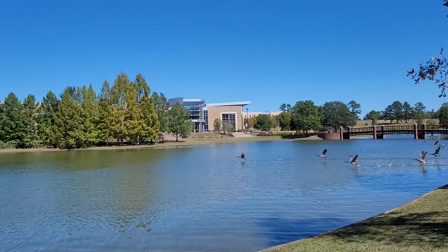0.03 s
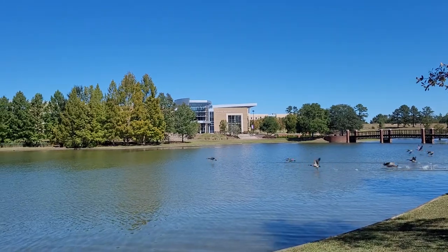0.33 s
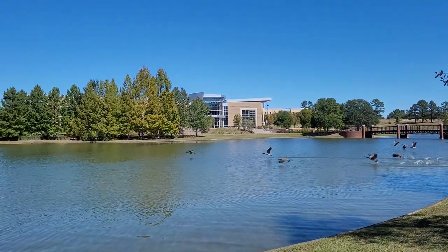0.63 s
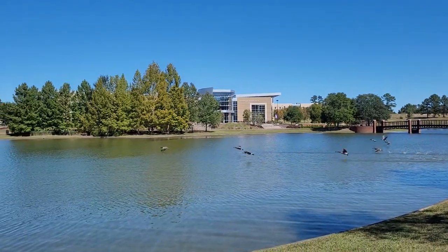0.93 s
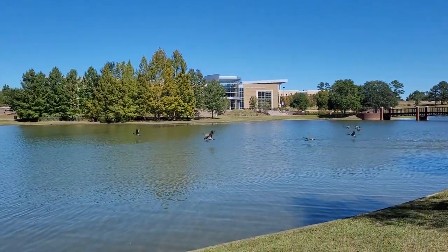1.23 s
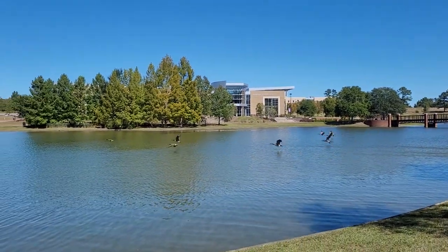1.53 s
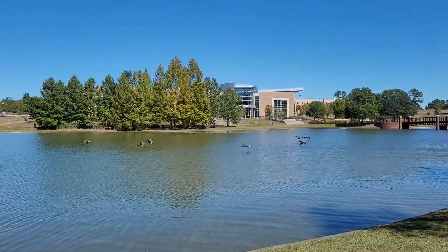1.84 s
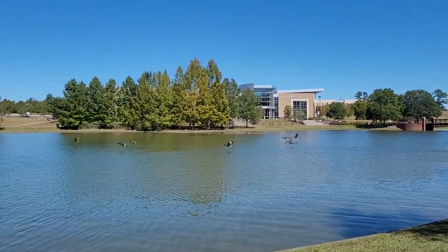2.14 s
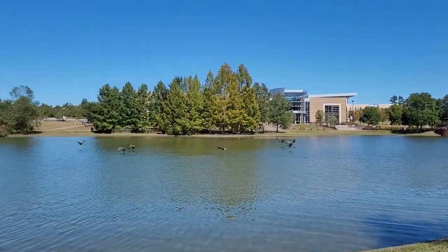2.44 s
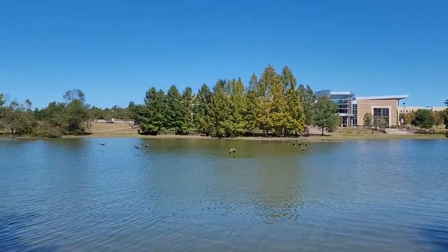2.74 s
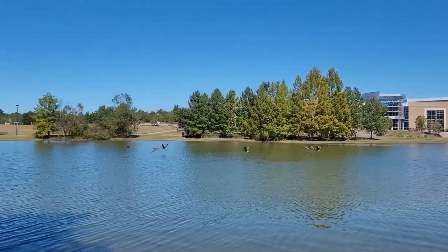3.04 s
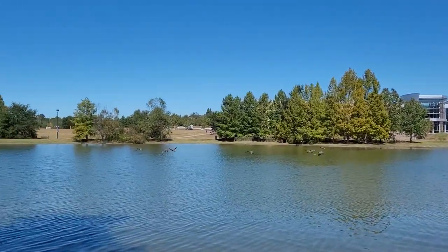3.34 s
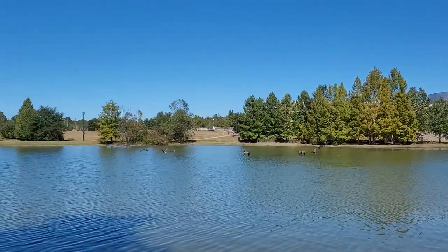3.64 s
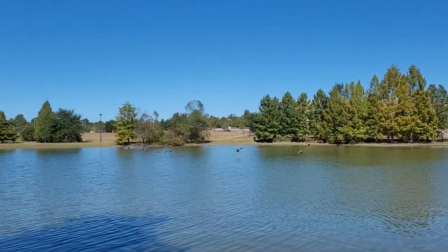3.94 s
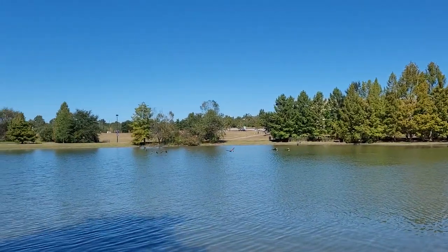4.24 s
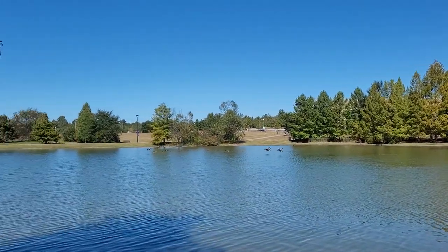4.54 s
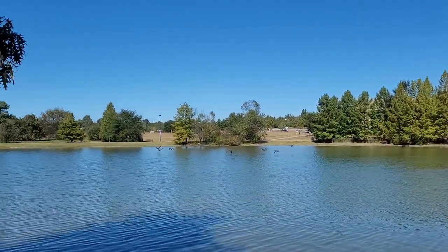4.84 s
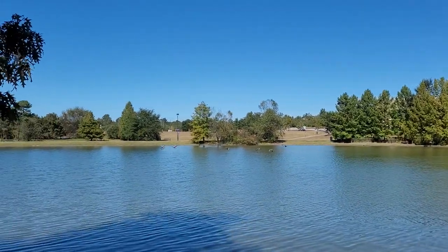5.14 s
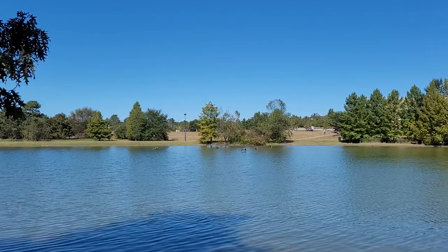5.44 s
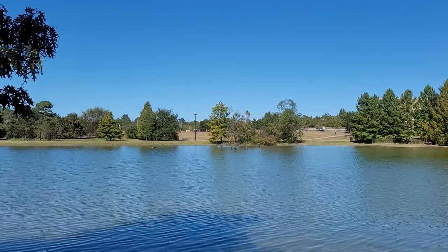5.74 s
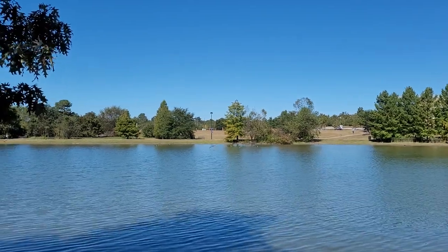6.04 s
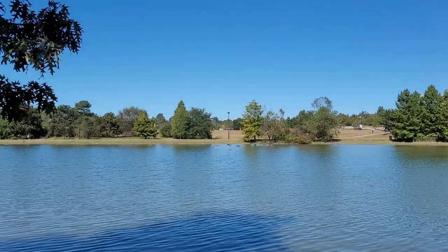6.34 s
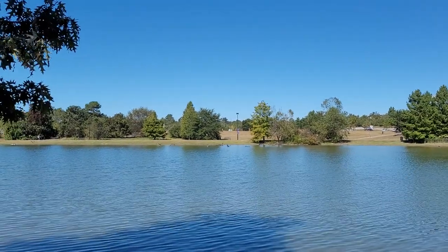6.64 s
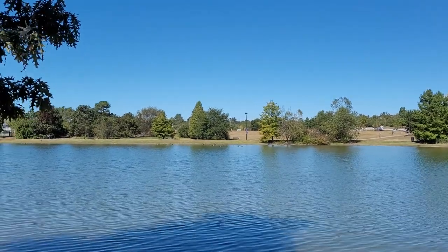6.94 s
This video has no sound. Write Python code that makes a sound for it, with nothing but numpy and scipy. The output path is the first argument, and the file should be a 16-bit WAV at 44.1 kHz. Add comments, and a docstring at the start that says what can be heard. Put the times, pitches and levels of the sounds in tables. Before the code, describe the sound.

Geese take off from a pond in open land, with faint splashing in the first second or two. They honk over and over as they fly low from right to left, one leading with yelping, two-part honks while others answer with honks and short falling clucks. The calls echo softly off the far bank and gradually weaken. Wind rumbles on the microphone, gusting more near the end.

```python
"""A pond in open land. Geese take off, splashing, and fly away low, right to left, calling to each other.
Each voice is a vibrating membrane shaped by the throat. The leader yelps, breaks into a low note and
flips up to a honk; others answer with honks and falling clucks. Faint, wavering honks or their echoes
come from the left, and the far bank echoes. Wind buffets the two microphone ports over a faint hush,
rustle and ticks."""
import sys
import numpy as np
from scipy import signal
from scipy.fft import rfft, irfft, next_fast_len
from scipy.io import wavfile
from scipy.ndimage import map_coordinates

SR = 44100
rng = np.random.default_rng(int(sys.argv[2]) if len(sys.argv) > 2 else 0)


def put_to_file(sound):
    """Save the sound as 16-bit audio at rate SR, in the file named by the first command-line argument."""
    columns = np.atleast_2d(sound).T  # one column per channel
    safe = np.clip(columns, -1, 1)
    whole_steps = np.round(safe * 32767)
    wavfile.write(sys.argv[1], SR, whole_steps.astype(np.int16))


N = 313110

# Path of the answering birds: (time [s], bearing [+ right])
FLOCK_PATH = [(.15, 1), (1.3, 0.19), (2.7, .45), (3.5, -0.24), (7, -0.37)]


def leader():
    """The lead goose: yelp, low note, rasp, honk."""
    # (time [s], bearing [+ right])
    path = [(.55, 1.3), (1.1, 1.16), (1.85, 0.57), (3.4, 0.64), (7, 0.21)]
    # Columns as in honks()
    notes = [ (.535, .55, .598, 735, 731, 702, -34.5, -25, -25.5, -50.5, 4, -41),
             (1.033, 1.105, 1.135, 680.4, 757, 707, -32.5, -22.5, -34, -49.5, -8, -35.5),
             (1.8, 1.905, 1.953, 690, 730.4, 700, -33, -20, -25, -48.5, -0.5, -37),
             (2.625, 2.755, 2.805, 677, 723.6, 678, -33, -25, -29.5, -50.5, -4.5, -41),
             (3.31, 3.42, 3.455, 681, 717.4, 654, -35, -27.5, -32, -59, 4.5, -44),
             (3.945, 4.05, 4.082, 679.5, 704, 700, -37.5, -26.5, -35, -61, 6.5, -44.5),
             (4.87, 5.025, 5.09, 672.4, 685.3, 637, -37, -26, -29.5, -64.5, 6, -46),
             (5.72, 5.89, 5.925, 653, 686, 646, -39, -28, -33, -68.5, 3.5, -48.5),
             (6.83, 6.975, 7.11, 659, 687, 688, -40.5, -34, -32, -65.5, 5, -44.5)]
    voice = yelps(path) + low_notes(path)
    voice += honks(notes, path, bend=1.9, jitter=.006, shimmer_db=.96, bright_db=-.5, air_db=10.5)
    voice += rasps(notes, path, lead_s=.07, overlap_s=.024, swell_db=2)
    return voice * amp([[.84], [-.84]])  # slightly louder in the left channel


def follower():
    """An answering goose with a brighter throat."""
    # Columns as in honks()
    notes = [ (.447, .5, .545, 670.6, 757, 750, -33, -25, -30.5, -60, 11, -36.5),
             (3.42, 3.455, 3.52, 709, 721, 620, -42.5, -18.5, -35, -76, 5, -47),
             (4.17, 4.25, 4.335, 711, 737, 622, -37.5, -26.5, -31, -67, 11, -45.5),
             (4.89, 4.93, 5.0, 736, 722, 712, -37, -34, -32, -66, 9.5, -46),
             (5.595, 5.635, 5.71, 646, 724, 702, -37, -23.5, -36.5, -63.5, -3, -41.5),
             (6.31, 6.345, 6.43, 725, 732.5, 674, -39.5, -33, -37, -63.5, -3.5, -47.5)]
    # Throat colour: (frequency [Hz], gain [dB])
    ring = [(2300, -1), (2900, -4.5), (3600, -1), (4400, -0.5), (5100, 15), (5800, 8), (6600, 5.5),
            (8000, 2.5)]
    voice = honks(notes, FLOCK_PATH, bend=.89, jitter=.0045, shimmer_db=.7, bright_db=2.5, air_db=6)
    return coloured(voice, ring) + rasps(notes, FLOCK_PATH, lead_s=.082, overlap_s=.024, swell_db=11)


def brassy_goose():
    """A low-pitched goose with fewer harmonics."""
    # Columns as in honks()
    notes = [ (1.125, 1.167, 1.24, 479, 513.3, 479, -40.5, -39, -34.5, -58.5, 2, -38.5),
             (1.812, 1.84, 1.93, 488, 502, 505, -38, -31, -31.5, -55, 0, -52),
             (2.64, 2.65, 2.71, 511, 499, 494, -44, -31, -33.5, -61.5, 0, -51)]
    voice = honks(notes, FLOCK_PATH, bend=.8, jitter=.005, shimmer_db=.2, bright_db=1, air_db=11.5,
                  harmonics=8)
    return voice + rasps(notes, FLOCK_PATH, lead_s=.004, overlap_s=.047, swell_db=1.5)


def honks(notes, path, bend, jitter, shimmer_db, bright_db, air_db, harmonics=16):
    """The bird strains towards a crest, bending and brightening the note, which then fades.
    notes: (start, crest, end [s], pitch at each [Hz], fundamental, octave at start, octave at crest,
    treble, third-harmonic lift, opening rasp [dB])"""
    # Air forced through the throat: (frequency [Hz], density [dB])
    air_colour = [(1500, -21), (3300, 0.5), (4300, 0), (6000, 6), (8000, -4), (11000, -8.5), (15000, -18)]
    attack_s, attack_db, strain_db = .014, 6.5, 7
    peak_s, peak_db, fade_db, treble_fade_db = .033, 3.5, 10.5, 11
    out, air = np.zeros((2, N)), noise(air_colour)
    for start, crest, end, start_hz, crest_hz, end_hz, *levels in notes:
        first_db, open_db, crest_db, treble_db, third_db, _ = levels
        t, gate = note_span(start, end, edge_s=.009)
        strain, droop = progress(t, start, crest) ** bend, progress(t, crest, end) ** 2
        pitch_hz = start_hz + (crest_hz - start_hz) * strain + (end_hz - crest_hz) * droop
        octave_db = open_db + (crest_db - open_db) * strain - fade_db * droop
        octave_db -= attack_db * (1 - progress(t, start, start + attack_s))
        high_db = treble_db + bright_db - strain_db * (1 - strain) - treble_fade_db * droop
        high_db += peak_db * (swell(t, crest, peak_s) - .5)
        voice = syrinx(t, pitch_hz, first_db - fade_db * droop, octave_db, high_db,
                       curves(path, t)[0], jitter, shimmer_db, harmonics, third_db)
        # The harder the honk, the larger its share of air.
        breath = amp(1.3 * high_db + air_db) * air[:, np.round(t * SR).astype(int)]
        add(out, t, gate * (voice.real + breath))
    return out


def yelps(path, depth=.042, dip_db=4.5, bright_db=5.5):
    """One pitch swing, down and up; the octave is loudest at the bottom, the treble at the top."""
    # (time [s], length [s], pitch [Hz], fundamental [dB], octave [dB], treble [dB])
    notes = [(0.936, 0.048, 698, -36, -25, -63), (1.69, 0.044, 708, -34.5, -24.5, -51.5),
             (2.51, 0.055, 708, -36, -27.5, -57.5), (3.189, 0.049, 698, -37.5, -36, -66),
             (3.838, 0.052, 684, -39.5, -31, -63), (4.723, .048, 671, -39.5, -27.5, -66.5),
             (5.518, 0.045, 685, -46, -37.5, -67), (6.686, 0.049, 674, -44.5, -34.5, -71)]
    out = np.zeros((2, N))
    for start, length, hz, first_db, octave_db, treble_db in notes:
        t, gate = note_span(start, start + length)
        swing = -np.sin(2 * np.pi * progress(t, start, start + length))
        voice = syrinx(t, hz * (1 + depth * swing), first_db, octave_db - dip_db * (1 + swing),
                       treble_db - bright_db * (1 - swing), curves(path, t)[0],
                       jitter=.01, shimmer_db=.5)
        add(out, t, gate * voice.real)
    return out


def low_notes(path, rise=.05, swell_db=12, slide_depth=.089, slide_s=.008):
    """The low register, about a fifth down, pushed harder until it flips up."""
    # (time [s], length [s], pitch [Hz], fundamental [dB], final octave [dB])
    notes = [(.48, 0.048, 488.4, -36.5, -27.5), (.975, 0.065, 483, -41, -36), (1.733, 0.071, 476, -36, -26),
             (2.557, 0.075, 471.5, -34, -27), (3.24, 0.07, 466, -37.5, -29), (3.886, 0.058, 469, -40, -29),
             (4.772, .1, 459, -40, -27.5), (5.645, 0.082, 461.3, -42, -32.5),
             (6.26, 0.044, 466, -46.5, -37), (6.741, 0.091, 464, -48, -39)]
    out = np.zeros((2, N))
    for start, length, hz, first_db, end_db in notes:
        t, gate = note_span(start, start + length, edge_s=.024)
        push = progress(t, start, start + length) ** 1.4
        slide = np.exp(-np.abs(t - start) / slide_s) + np.exp(-np.abs(t - start - length) / slide_s)
        pitch_hz = hz * (1 + rise * push ** 2 + slide_depth * slide)
        octave_db = end_db - swell_db * (1 - push)
        voice = syrinx(t, pitch_hz, first_db, octave_db, octave_db - 36, curves(path, t)[0],
                       jitter=.004, shimmer_db=.5, harmonics=8)
        add(out, t, gate * voice.real)
    return out


def clucks(flap_ratio=.29, hiss_db=-24, sideband_db=6):
    """Short falling notes; a slower second vibration adds sidebands and chops the air."""
    # (time [s], pitch [Hz], fundamental [dB], octave [dB], sideband depth [ratio], opening rasp [dB])
    notes = [(.175, 800, -35.5, -43, 1.04, -40.5), (.63, 796, -39.5, -47, 0.71, -42.5),
             (1.23, 730, -48.5, -45.5, 0.3, -46), (1.575, 774.6, -36, -41.5, 0.75, -45),
             (1.948, 781, -36.5, -45, 0.73, -39.5), (2.362, 768, -35, -40.5, 0.6, -42),
             (2.74, 790, -38.5, -41.5, 0.91, -42.5), (2.93, 800, -37, -35, 0.46, -46),
             (3.195, 779.4, -38.5, -46.5, 1.4, -43.5), (3.615, 778, -37, -38, 0.44, -49),
             (4.1, 780, -34.5, -34, 0.68, -39), (4.498, 770, -36.5, -37, .65, -40),
             (4.87, 782.5, -40.5, -40.5, .67, -43.5), (5.3, 775, -38, -39, 0.6, -45),
             (5.785, 777, -40.5, -43.5, 0.77, -43), (6.13, 781, -39, -37.5, .15, -42.5),
             (6.503, 763, -42.5, -40.5, 0.17, -48.5), (6.915, 769, -45.5, -42, 0.63, -59)]
    # Course of one cluck: (offset [s], pitch [ratio], level [dB])
    shape = [(-.012, 1.015, -11), (.006, .995, 0), (.035, .95, 0), (.062, .912, -5), (.085, .88, -16)]
    # Throat filters: (frequency [Hz], gain [dB])
    sideband_colour = [(330, -18.5), (540, -12), (1000, -37.5), (1250, -5), (1700, 13.5), (2100, -19.5)]
    hiss_colour = [(2800, -19), (4200, -9.5), (5000, -3), (6000, -4.5), (7000, -7.5), (8500, -28)]
    out = np.zeros((2, N))
    for start, hz, first_db, octave_db, depth, _ in notes:
        course = np.array(shape) + [start, 0, 0]
        t, gate = note_span(course[0, 0], course[-1, 0])
        ratio, db = curves(course, t)
        pitch_hz = hz * ratio
        flap_hz = flap_ratio * pitch_hz * (1 + .046 * wobble(t, 300))
        flap = np.exp(-2j * np.pi * np.cumsum(flap_hz) / SR)  # shifts each harmonic down
        voice = syrinx(t, pitch_hz, first_db + db, octave_db + db, octave_db + db - 28,
                       curves(FLOCK_PATH, t)[0], jitter=.008, shimmer_db=1.14)
        modulation = flap + .18 * amp(-150 * (t - t[0])) * flap ** 2 + .048 / flap
        sidebands = amp(sideband_db) * depth * coloured((voice * modulation).real, sideband_colour)
        air = (1 + flap.real) * rng.standard_normal((2, len(t)))
        hiss = amp(first_db + hiss_db + 2 * db) * unit(coloured(air, hiss_colour))
        add(out, t, gate * (voice.real + sidebands + hiss))
    return out + rasps(notes, FLOCK_PATH, lead_s=.052, overlap_s=.02, swell_db=9)


def rasps(calls, path, lead_s, overlap_s, swell_db, rate_hz=200, breath=.15, gain_db=2.5):
    """The voice catches as a call opens: uneven membrane slaps ring the throat, each with a puff of air."""
    # (frequency [Hz], gain [dB])
    colour = [(300, -31.5), (520, 3), (720, 5), (860, -3.5), (1080, 8.5), (1300, 10.5), (1550, -6),
              (1850, -3.5), (2200, -18.5), (2800, -25), (4200, -28.5), (6300, -32.5), (8000, -45),
              (14000, -48)]
    out = np.zeros((2, N))
    age = np.arange(SR // 100) / SR
    ring = sum(np.sin(2 * np.pi * hz * age) * np.exp(-age / .003) for hz in (700, 1100, 1330))

    def throat(hz):
        """The ringing delays each frequency differently, rounding off the slaps."""
        phase = np.angle(signal.freqz(ring, worN=hz, fs=SR)[1])
        return amp(along(colour, hz)) * np.exp(1j * phase)

    for start, *_, db in calls:
        t, gate = note_span(start - lead_s, start + overlap_s, edge_s=.028)
        cycles = np.cumsum(rate_hz * (1 + .1 * rng.standard_normal() + .06 * wobble(t, 150))) / SR
        slaps = np.diff(np.floor(cycles), prepend=0) * amp(1.3 * wobble(t, 200))
        puffs = rng.standard_normal(len(t)) * np.exp(-3 * (cycles % 1))
        voice = unit(filtered(unit(slaps) + breath * unit(puffs), throat))
        bearing = curves(path, t[0])[0]
        level_db = db + gain_db + swell_db * (progress(t, t[0], t[-1]) - .5)
        add(out, t, filtered(voice * gate * amp(level_db), lambda hz: ports(hz, bearing)))
    return out


def syrinx(t, pitch_hz, first_db, octave_db, treble_db, bearing, jitter, shimmer_db,
           harmonics=16, third_db=0):
    """Membrane harmonics (complex, stereo): two strong ones, the rest shaped by the throat."""
    # Upper resonances: (frequency [Hz], gain re treble [dB])
    throat = [(1450, 18), (2200, 8.5), (2600, -1.5), (3100, -12), (3700, -8), (4400, -3.5), (5100, -17),
              (5800, -9), (6600, -13.5), (7400, -22.5), (8100, -18), (9000, -27), (11500, -28.5),
              (15000, -41.5)]
    phase = 2 * np.pi * np.cumsum(pitch_hz * (1 + jitter * wobble(t, 417.4))) / SR
    slip = .1 * wobble(t, 600)  # early or late closures smear the high harmonics most
    voice = np.zeros((2, len(t)), complex)
    for k in range(1, harmonics + 1):
        # The reflection off the water lifts or cancels overtones as the bird moves.
        fading_db = 3 * wobble(t, 45) + 3 * rng.standard_normal((2, 1))
        overtone_db = treble_db + along(throat, k * pitch_hz) + fading_db + third_db * (k == 3)
        db = first_db if k == 1 else octave_db if k == 2 else overtone_db
        angle = k * phase + max(k - 2, 0) * slip + rng.uniform(0, 2 * np.pi)
        voice += amp(db) * np.exp(1j * angle) * ports(k * pitch_hz, bearing)
    return np.sqrt(2) * voice * amp(shimmer_db * wobble(t, 497.2))


def ports(hz, bearing):
    """Complex gain at the left and right port: a bird on the right reaches the right one first."""
    # (frequency [Hz], quadrature side share per unit bearing [ratio])
    spread = [(500, 0.16), (720, 0.2), (1000, 0.6), (1400, 1.04), (2200, .7), (4000, 1.6), (9000, 1.1)]
    # (frequency [Hz], in-phase side share [ratio])
    lean = [(700, -0.056), (1000, 0.079), (1400, 0.029), (2200, -0.53), (2900, -0.34), (3700, 0.64),
            (4500, 0.43), (6000, -.1), (8000, -0.27)]
    side = along(lean, hz) - 1j * bearing * along(spread, hz)
    return np.array([1 + side, 1 - side])


def far_calls(arch_db=2.5):
    """Faint, wavering honks or their echoes from the left, their treble lost on the way."""
    # (time [s], length [s], start pitch [Hz], end pitch [Hz], level [dB])
    notes = [(2.805, .26, 654, 684, -45.5), (4.369, 0.096, 649, 632, -46.5), (5.111, .12, 702, 705, -47),
             (5.918, 0.2, 716, 674, -43)]
    out = np.zeros((2, N))
    for start, length, start_hz, end_hz, peak_db in notes:
        t, gate = note_span(start, start + length, edge_s=.02)
        u = progress(t, start, start + length)
        db = peak_db - arch_db * (2 * u - 1) ** 2 + 1.6 * wobble(t, 40)
        pitch_hz = start_hz + (end_hz - start_hz) * u
        voice = syrinx(t, pitch_hz, db - 4.5, db, db - 30.5, bearing=-2, jitter=.014, shimmer_db=2)
        add(out, t, gate * voice.real)
    return out


def far_bank(x, t, delay_s=.26, echo_db=-32, tail_db=-25):
    """Trees across the pond return a scattered tail and one soft echo, blurred by moving air and leaves."""
    # (frequency [Hz], t60 [s])
    decay = [(300, 0.9), (1400, 0.46), (4000, 0.14), (10000, 0.023)]
    hz, age, spectrum = signal.stft(rng.standard_normal((2, SR)), SR, nperseg=256)
    tail = signal.istft(spectrum * amp(-60 * age / along(decay, hz)[:, None]), SR, nperseg=256)[1]
    wet = signal.fftconvolve(x, tail / np.linalg.norm(tail[0]), axes=1)[:, :N]
    wet *= .75 + .7 * np.array([wobble(t, 90), wobble(t, 90)])
    echo = np.pad(wet, ((0, 0), (int(delay_s * SR), 0)))[:, :N]
    return amp(tail_db) * wet + amp(echo_db) * echo


def wind(t, gain_db=-1, lumpy_db=3):
    """Eddies buffet each port on its own; sharp gusts hit mainly one and reach higher in pitch."""
    # (time [s], left level [dB], right level [dB])
    breeze = [(.1, -36.5, -40), (1.1, -35.5, -41.5), (1.7, -38.5, -34.5), (2.45, -29.5, -33.5),
              (3, -44.5, -27.5), (3.6, -31.5, -41), (4.15, -37.5, -32.5), (4.6, -27, -35), (5.3, -44, -30),
              (5.8, -33.5, -26.5), (6.3, -34, -41), (6.85, -55, -38)]
    # (time [s], width [s], level [dB], left minus right [dB])
    gusts = [(1.228, 0.019, -27.5, 22), (1.306, .02, -28.5, 16), (2.184, 0.073, -24.5, -11),
             (2.697, 0.06, -23.5, -14), (2.761, .028, -18, 25), (3.384, 0.078, -26, 18),
             (3.547, 0.019, -17.5, 31), (3.847, 0.013, -27.5, -12), (5.466, .11, -24.5, -25),
             (6.112, .025, -11, 26.5), (6.448, 0.054, -13, 30), (6.586, 0.13, -19, 31),
             (6.663, .03, -20.5, 34)]
    # Both: (frequency [Hz], density [dB])
    buffet_colour = [(18, -48), (30, -19), (42, 5), (62, 3.5), (100, -1), (150, -7), (250, -19),
                     (450, -39.5), (1000, -75)]
    gust_colour = [(25, -24.5), (45, -0.5), (72, 3), (140, 0), (195, -8.5), (270, -10), (400, -28),
                   (900, -49.5), (3000, -69.5)]
    lumps = amp(lumpy_db * np.array([wobble(t, 22), wobble(t, 22)]))
    buffet = amp(np.array(curves(breeze, t)) + gain_db) * unit(lumps * noise(buffet_colour))
    gust_gain = sum(amp(db + np.minimum([[pan_db], [-pan_db]], 0)) * swell(t, at, width)
                    for at, width, db, pan_db in gusts)
    return buffet + gust_gain * noise(gust_colour)


def hush(t, level_db=-49):
    """The steady sound of open land, more alike in both channels at low pitch."""
    # (frequency [Hz], density [dB])
    colour = [(150, -9.5), (250, 1.5), (450, -7.5), (700, -7.5), (1400, -9), (2150, -9), (2750, -25.5),
              (4200, -24), (6000, -30.5), (9000, -38.5), (11000, -35), (13000, -51.5), (15800, -54.5)]
    # (frequency [Hz], left-right correlation [ratio])
    likeness = [(250, 1), (700, 0.0024), (1400, 0), (3000, 0.053), (10000, 0)]
    side_gain = lambda hz: np.tan(np.arccos(along(likeness, hz)) / 2)
    mid, side = noise(colour)
    side = filtered(side, side_gain)
    return amp(level_db + .21 * wobble(t, 1.96)) * np.array([mid + side, mid - side])


def rustle(t, gain_db=1, grain_db=3):
    """A fine crackly hiss near the microphone, with brief swells."""
    # (time [s], level [dB])
    floor = [(.1, -67), (2.2, -73.5), (4.4, -68), (7, -69)]
    # (time [s], width [s], level [dB])
    swells = [(4.432, 0.23, -65), (5.46, 0.12, -58.5), (6.147, 0.1, -66), (6.31, 0.041, -58.5),
              (6.48, 0.28, -65), (6.918, .08, -69)]
    # (frequency [Hz], density [dB])
    colour = [(2000, -27), (4000, -7.5), (7000, 0), (9000, -4), (10800, 3.5), (13200, -10.5), (15400, -5)]
    grain = amp(grain_db * wobble(t, 460))
    power = amp(curves(floor, t)[0]) ** 2
    power += sum((amp(db) * swell(t, at, width)) ** 2 for at, width, db in swells)
    return amp(gain_db) * np.sqrt(power) * unit(grain * noise(colour)) * amp([[1.3], [-1.3]])


def splashes(t, drops_per_s=260):
    """Feet and wings slap the pond and spray patters as the last birds run for take-off."""
    # (time [s], level [dB])
    envelope = [(.06, -56.5), (.13, -50.5), (.3, -58), (.5, -48), (.85, -59), (1.2, -52), (1.7, -95)]
    # (frequency [Hz], gain [dB])
    colour = [(500, -15.5), (1500, -16), (2200, 11), (2900, -2), (3900, 4), (5500, -12),
              (10000, -14.5), (15000, -41)]
    drops = (rng.random((2, N)) < drops_per_s / SR) * rng.standard_normal((2, N))
    spray = unit(coloured(unit(drops) + rng.standard_normal((2, N)), colour))
    return amp(curves(envelope, t)[0] + .85 * wobble(t, 3.6) + 1.7 * wobble(t, 28)) * spray


def ticks(t, t60_s=.014):
    """Tiny dry snaps close by: a bright crack over a duller body."""
    # (time [s], crack [dB], body [dB])
    snaps = [(0.3318, -37.5, -32), (4.4925, -51, -48.5), (4.5308, -53, -52), (5.458, -42, -57),
             (5.497, -39.5, -41), (6.463, -44.5, -52), (6.4757, -46.5, -56), (6.577, -47, -52)]
    crack = noise([(1200, -29), (3000, 1), (10500, 10), (15000, -5)])
    body = noise([(1500, -7.5), (3000, -3.5), (4200, -10.5), (7000, -18), (14000, -37)])
    out = np.zeros((2, N))
    for at, crack_db, body_db in snaps:
        decay = amp(-60 * np.abs(t - at) / t60_s) * (t >= at)
        out += decay * (amp(crack_db) * crack + amp(body_db) * body)
    return out * amp([[3], [-2]])


def amp(db):
    """Decibels to gain."""
    return 10 ** (np.asarray(db) / 20)


def unit(x):
    """x at rms 1."""
    return x / np.sqrt(np.mean(x ** 2) + 1e-20)


def along(points, hz):
    """(frequency [Hz], value) points read on a log axis."""
    f, v = np.transpose(points)
    return np.interp(np.log(hz + 1), np.log(f + 1), v)


def curves(rows, t):
    """Each value column of a (time [s], ...) table at times t."""
    times, *columns = np.transpose(rows)
    return [np.interp(t, times, column) for column in columns]


def progress(t, start, end):
    """Linear ramp, 0 at start to 1 at end."""
    return np.clip((t - start) / max(end - start, 1e-3), 0, 1)


def swell(t, centre_s, width_s):
    """Bell-shaped rise and fall."""
    return np.exp(-2 * ((t - centre_s) / width_s) ** 2)


def wobble(t, knots_per_s):
    """Smooth random curve."""
    place = (t - t[0]) * knots_per_s
    return map_coordinates(rng.standard_normal(int(place[-1]) + 4), [place])


def filtered(x, response):
    """x through a response of frequency."""
    n = x.shape[-1]
    m = next_fast_len(n + SR // 5)
    return irfft(rfft(x, m) * response(np.fft.rfftfreq(m, 1 / SR)), m)[..., :n]


def coloured(x, colour):
    """x through a (frequency [Hz], gain [dB]) curve."""
    return filtered(x, lambda hz: amp(along(colour, hz)))


def noise(colour):
    """Uncorrelated stereo noise, rms 1."""
    return unit(coloured(rng.standard_normal((2, N)), colour))


def note_span(start, end, edge_s=.007):
    """A note's sample times and soft-edged gate."""
    start, end = start - edge_s / 2, end + edge_s / 2
    t = np.arange(max(int(start * SR), 0), min(int(end * SR), N)) / SR
    ramp = np.clip(np.minimum(t - start, end - t) / edge_s, 0, 1)
    return t, np.sin(np.pi / 2 * ramp) ** 2


def add(out, t, sound):
    """Mix a stereo sound in at its times."""
    out[:, round(t[0] * SR):][:, :len(t)] += sound


def scene():
    """The flock and its echo, with wind and small background sounds."""
    t = np.arange(N) / SR
    geese = leader() + follower() + brassy_goose() + clucks() + far_calls()
    return geese + far_bank(geese, t) + wind(t) + hush(t) + rustle(t) + splashes(t) + ticks(t)


def record(dry):
    """The microphone opens after a moment and keeps nothing above its band limit."""
    open_s, fade_s, top_hz = .06, .012, 15850
    opening = progress(np.arange(N) / SR, open_s, open_s + fade_s)
    return filtered(dry * opening, lambda hz: hz < top_hz)


dry = scene()
out = record(dry)
put_to_file(out)
```